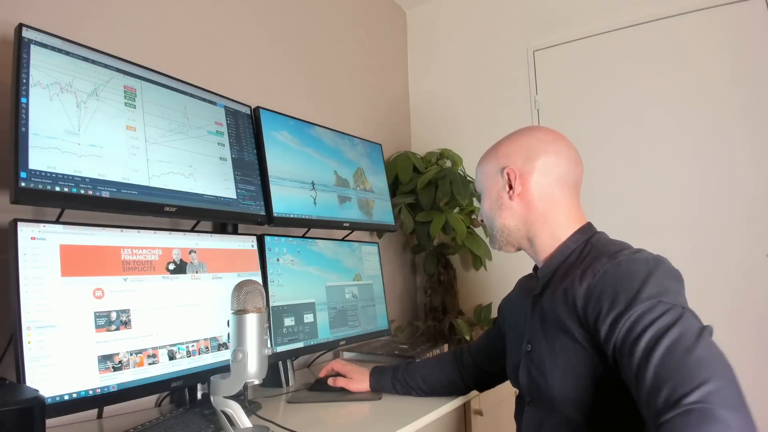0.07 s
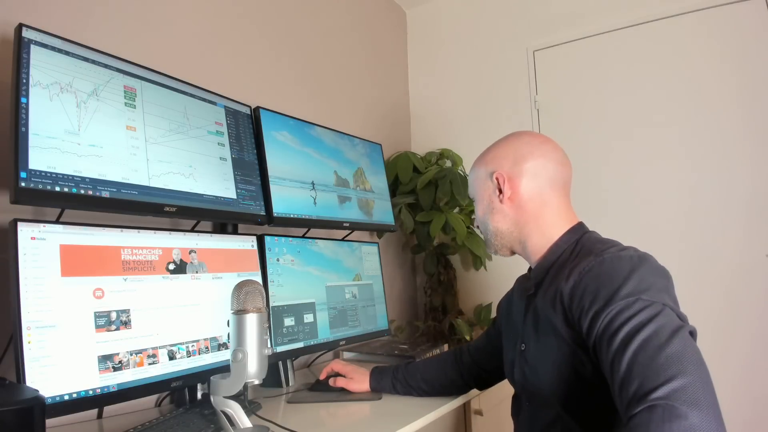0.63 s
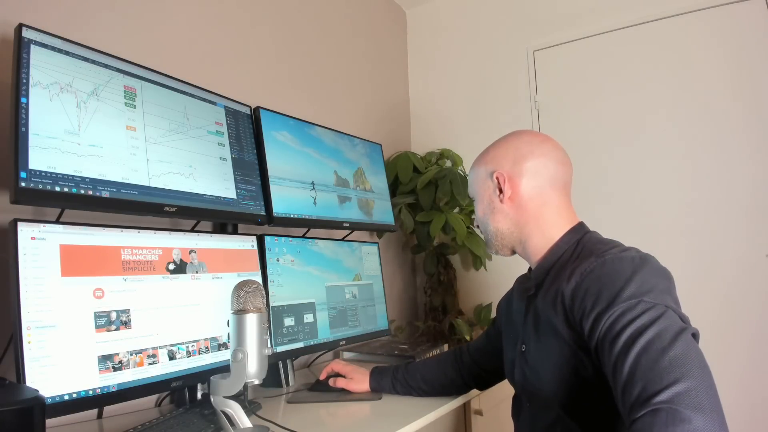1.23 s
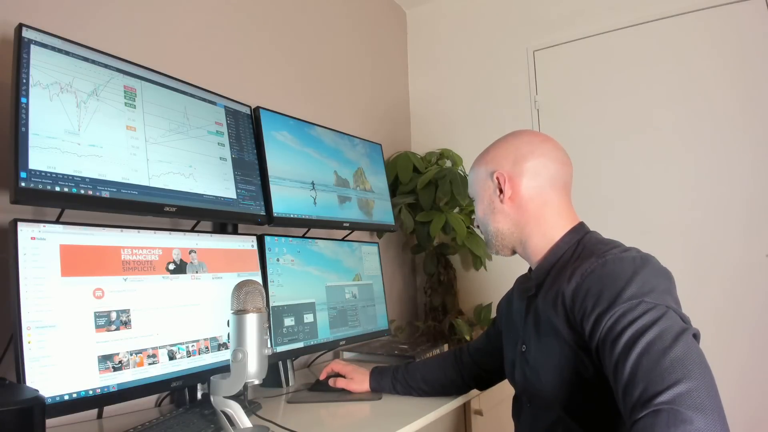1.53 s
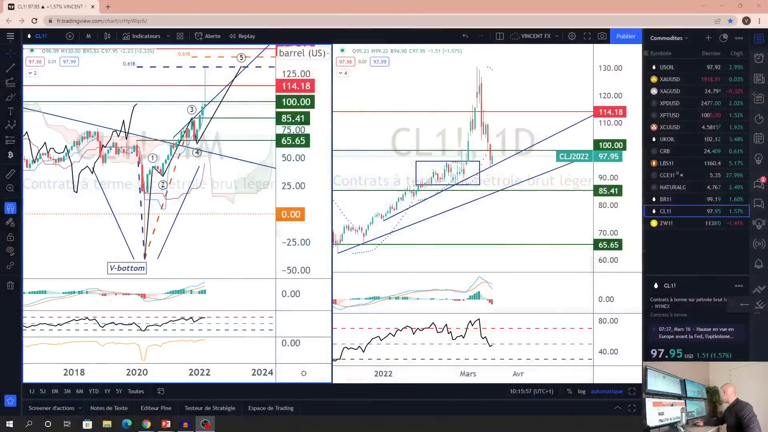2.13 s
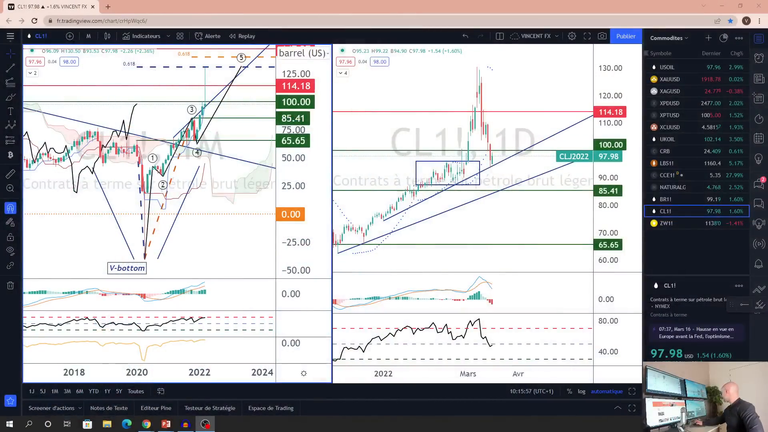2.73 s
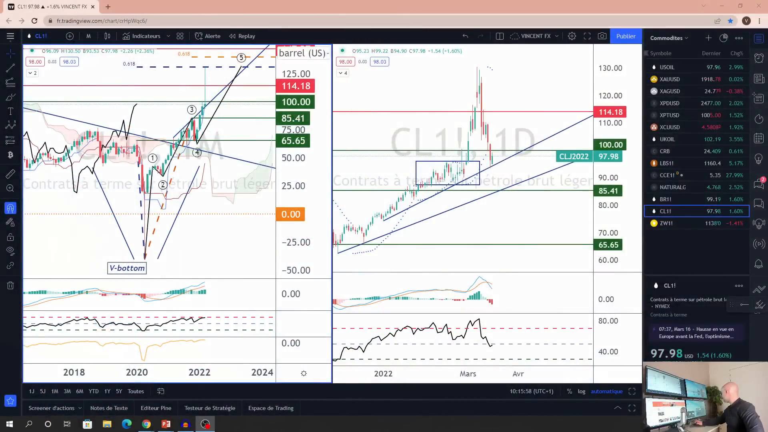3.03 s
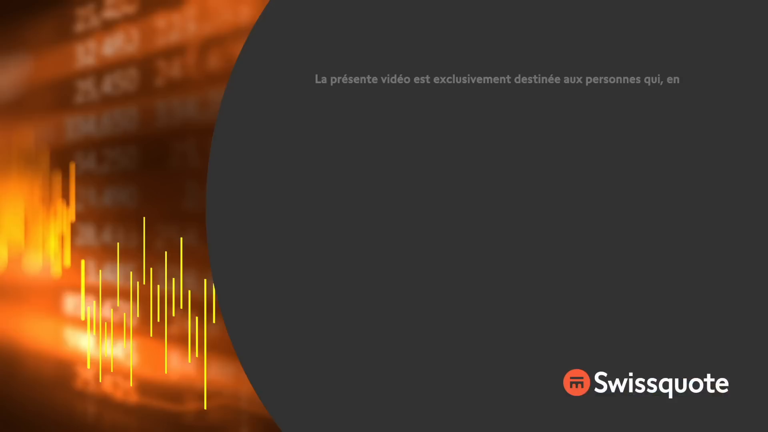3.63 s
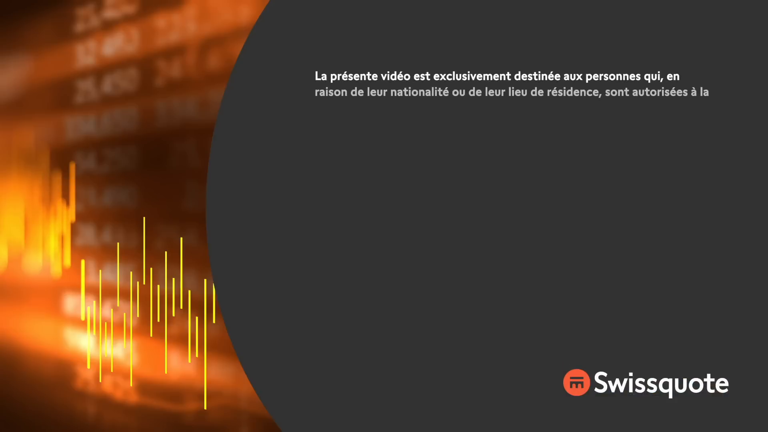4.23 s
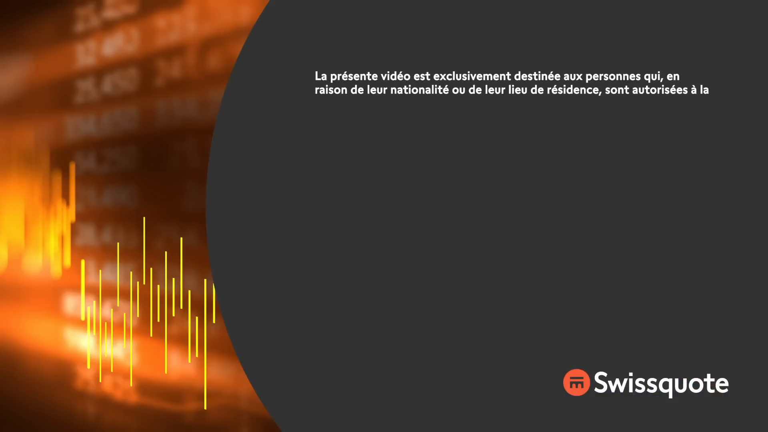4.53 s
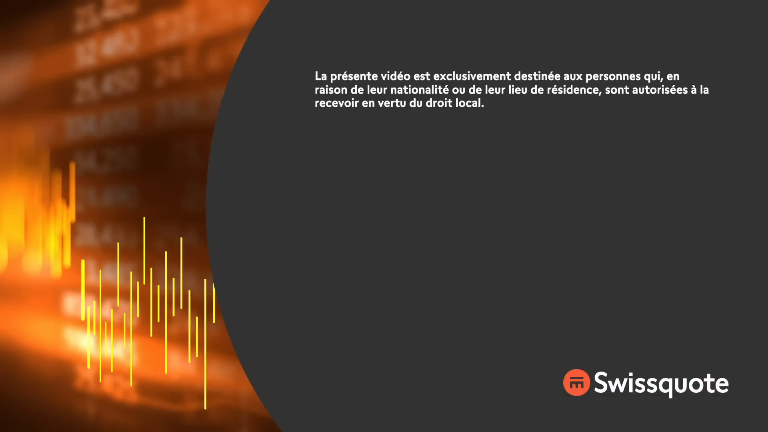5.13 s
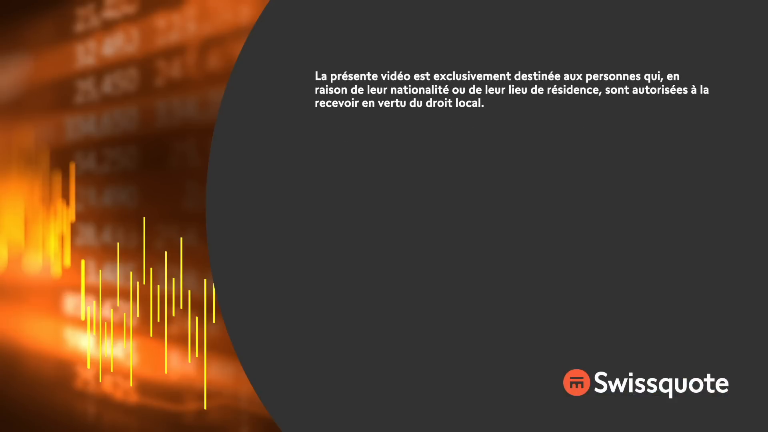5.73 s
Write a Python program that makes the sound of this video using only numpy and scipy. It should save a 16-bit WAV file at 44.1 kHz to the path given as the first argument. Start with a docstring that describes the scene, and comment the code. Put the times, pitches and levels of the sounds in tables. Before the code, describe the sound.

In a small, quiet room, fingers tick lightly and irregularly on keys and plastic. A computer mouse clicks down and up, then slides in short, gritty strokes. A hand bumps the desk, sending a deep rumble through the microphone stand. A second click follows, then more light taps, rubs and soft knocks. A computer hums faintly throughout.

```python
"""Mouse and keys at a quiet desk

Two mouse clicks snap down and up, the switch spring ringing with lever and shell. Fingers tick on keys
and plastic, and the mouse slides with a gritty rub. Knocks travel through the desk into the microphone
stand, which booms and sways. Behind it all, a computer hums and whines faintly in a small room."""
import sys
import numpy as np
from scipy import signal
from scipy.fft import rfft, irfft
from scipy.io import wavfile

SR = 44100
rng = np.random.default_rng(int(sys.argv[2]) if len(sys.argv) > 2 else 0)


def master(y):
    """Save y as 16-bit WAV."""
    cut = np.clip(np.atleast_2d(y).T, -1, 1)
    pcm = np.round(cut * 32767)  # scale
    wavfile.write(sys.argv[1], SR, pcm.astype(np.int16))


N = 255599
TIME = np.arange(N) / SR

# light taps on keys and plastic: t/s, level/dB, brightness/(dB per octave)
KEY_TAPS = [(0.146, -63.5, -1), (0.267, -67, -0.5), (0.35, -76, 10), (1.434, -61, 2.6),
            (1.522, -61.5, -4.5), (1.926, -64.5, -3), (2.125, -51, 1.8), (2.161, -56.5, 0),
            (2.526, -61.5, 0.5), (2.989, -62, -2.3), (3.027, -63, 6.5), (3.339, -65, -4), (3.551, -70.5, 2),
            (4.029, -65, 1), (4.128, -53.5, 2.6), (4.389, -55, 0.1), (4.496, -63, -0.5),
            (4.673, -60.5, -2.8), (5.493, -59.5, -1.8), (5.555, -59.5, -1.5)]
# mouse clicks: press t/s, gain/dB, bottoming-out t/s, gain/dB, release t/s, gain/dB, desk knock/dB
MOUSE_CLICKS = [(1.6561, -1.5, 1.685, -1, 1.7865, -2, -31.5), (3.0776, 0.5, 3.081, -5, 3.1965, 0.5, -33)]


def from_db(db):
    """Decibels to gain."""
    return 10 ** (np.asarray(db) / 20)


def rms_one(x):
    """Scale to unit rms."""
    return x / np.sqrt(np.mean(x ** 2) + 1e-30)


def at_level(hit, db):
    """Give a hit the energy of 5 ms of sound at this level."""
    return from_db(db) * hit * np.sqrt(.005 * SR / np.sum(hit ** 2))


def in_time(rows):
    """Draw an automation curve through each column of timed breakpoints."""
    times, *columns = np.transpose(rows)
    return [np.interp(TIME, times, column) for column in columns]


def add(track, s, sound):
    """Mix a sound in from time s."""
    at = max(round(s * SR), 0)
    track[at:at + len(sound)] += sound[:N - at]


def dying(t, t60):
    """Envelope that loses 60 dB in t60 seconds."""
    return np.exp(-np.log(1000) * t / t60)


def mode(t, hz, t60):
    """A struck mode rings as a decaying sine."""
    return np.sin(2 * np.pi * hz * t) * dying(t, t60)


def band(x, low_hz, high_hz, order=2):
    """Causal band-pass."""
    sos = signal.butter(order, [low_hz, min(high_hz, .45 * SR)], "band", fs=SR, output="sos")
    return signal.sosfilt(sos, x + 1e-18)


def resonate(x, hz, width_hz):
    """One resonance with unity gain at its peak."""
    r = np.exp(-np.pi * width_hz / SR)
    gain = (1 - r * r) / 2
    return signal.lfilter([gain, 0, -gain], [1, -2 * r * np.cos(2 * np.pi * hz / SR), r * r], x + 1e-18)


def body(x, modes):
    """Resonances in parallel, polarity alternating."""
    return sum((-1) ** k * from_db(db) * resonate(x, hz, width)
               for k, (hz, width, db) in enumerate(modes))


def coloured(spectrum):
    """Steady unit-rms noise shaped by an EQ curve: f/Hz, level/dB."""
    hz, db = np.transpose(spectrum)
    grid = np.maximum(np.fft.rfftfreq(N, 1 / SR), 1)
    eq = from_db(np.interp(np.log(grid), np.log(hz), db))
    return rms_one(irfft(rfft(rng.standard_normal(N)) * eq, N))


def tone(hz, waver):
    """A unit-rms tone whose phase wanders slowly."""
    walk = np.cumsum(rng.standard_normal(240))
    wander = np.interp(TIME, np.linspace(0, TIME[-1], len(walk)), walk)
    return np.sqrt(2) * np.sin(2 * np.pi * hz * TIME + waver * wander)


def contact(smear_s, scatter=0.64, stages=5):
    """A sharp blow bounces around inside the plastic: all-passes smear it and keep its spectrum flat."""
    hit = signal.unit_impulse(4096)
    for share in (np.arange(stages) + rng.random(stages)) / stages:
        gap = np.zeros(int(share * smear_s * SR))
        hit = signal.lfilter(np.r_[-scatter, gap, 1], np.r_[1, gap, -scatter], hit)
    return hit


def room(x, echo_db, echo_s=.0088, wet_db=-7.5, build_s=0.0053):
    """A reflection off the desk, then a diffuse tail that dies sooner in the treble."""
    # room decay: f/Hz, t60/s
    decay = [(200, 0.55), (1000, 0.34), (3000, 0.41), (7000, 0.32), (15000, 0.19)]
    hz, t60 = np.transpose(decay)
    t, edges = TIME[:SR // 2], np.geomspace(150, 19000, 11)
    tail = np.zeros(len(t))
    for low, high in zip(edges, edges[1:]):
        band_t60 = np.interp(np.log(low * high) / 2, np.log(hz), t60)
        tail += band(rng.standard_normal(len(t)), low, high) * dying(t, band_t60)
    tail *= 1 - dying(t, build_s)
    reverb = signal.fftconvolve(x, tail / np.sqrt(np.sum(tail ** 2)))[:N]
    echo = np.interp(TIME - echo_s, TIME, x)
    return x + from_db(wet_db) * reverb + from_db(echo_db) * echo


def air(level_db=-64.5):
    """A soft, dark bed of room tone."""
    # colour of the room air: f/Hz, relative level/dB
    spectrum = [(70, -17), (130, -1), (205, -1), (300, -5.5), (410, -12.5), (490, -8), (650, -14.5),
                (1000, -19), (1600, -24.5), (3000, -26.5), (4000, -32), (7000, -32), (11000, -34),
                (15800, -36.5)]
    return from_db(level_db) * coloured(spectrum)


def computer(hum_hz=103.5, fizz_db=-89):
    """The fan hum swells and dips under weaker tones, thin electronic whines and a narrow fizz."""
    # fan hum automation: t/s, level/dB
    hum_levels = [(0.0, -70), (0.06, -83), (0.21, -59.5), (1.0, -71), (1.16, -66), (1.45, -79),
                  (1.81, -56.5), (1.98, -67), (2.55, -56), (2.99, -72.5), (4.52, -57), (4.86, -72.5),
                  (5.1, -56.5), (5.8, -69.5)]
    # fan tones: f/Hz, level/dB
    fan_tones = [(251, -76.5), (332, -83), (375, -82.5)]
    # electronic whines: f/Hz, level/dB
    whine_tones = [(2541, -88), (2740, -99), (3225, -92), (3618, -99), (4398, -94.5), (4495, -89),
                   (4592, -93), (4640, -92.5), (4791, -95), (4840, -97), (5082, -100), (5378, -95),
                   (5426, -98), (5814, -94.5), (6551, -100), (7526, -93), (8845, -100), (10115, -95)]
    hum = from_db(in_time(hum_levels)[0]) * tone(hum_hz, waver=0.14)
    fan = sum(from_db(db) * tone(hz, waver=0.602) for hz, db in fan_tones)
    whine = sum(from_db(db) * tone(hz, waver=0.792) for hz, db in whine_tones)
    fizz = rms_one(band(rng.standard_normal(N), 4380, 4920))
    return hum + fan + whine + from_db(fizz_db) * fizz


def stand(rumble_gain_db=3.5, mean_boom_db=-65, boom_follows=0.53):
    """Bumps sway the microphone stand; the resting arm keeps it rumbling and the desk booming."""
    # heavy bumps: t/s, level/dB
    bumps = [(2.526, -28.5), (2.709, -39.5), (2.930, -49)]
    # modes of the stand: f/Hz, gain/dB, t60/s
    sway_modes = [(27.14, -1.5, 0.71), (31.8, 1, 0.19), (51.9, -4.5, 0.45)]
    # unrest of the arm on the desk: t/s, relative level/dB
    tremor = [(0.0, -58.5), (0.66, -67), (2.36, -56), (2.71, -55), (3.24, -55), (3.83, -56.5), (3.97, -57),
              (5.0, -63), (5.8, -60)]
    out = np.zeros(N)
    sway = sum(-from_db(db) * mode(TIME, hz, t60) for hz, db, t60 in sway_modes)
    attack = 1 - dying(TIME, 0.081)
    for s, db in bumps:
        add(out, s, from_db(db) * sway * attack)
    rumble = coloured([(8, -14.5), (20, -9.5), (27, -6.5), (40, -7.5), (54, -14.5), (75, -22),
                       (130, -24.5), (400, -68.5)])
    boom = coloured([(60, -48), (115, -8), (155, 1.5), (200, -11.5), (260, -29.5), (700, -77)])
    unrest_db = in_time(tremor)[0]
    boom_db = mean_boom_db + boom_follows * (unrest_db - unrest_db.mean())
    return out + from_db(unrest_db + rumble_gain_db) * rumble + from_db(boom_db) * boom


def desk(lag_s=0.006, release_gain_db=-2, tap_gain_db=5, ring_db=-10, ring_lag_s=0.02894):
    """Clicks, taps and the hand knock the desk: close modes swell together and cancel; one rings on."""
    # the hand lands on the desk: t/s, peak level/dB
    thumps = [(2.531, -37), (2.568, -41), (4.036, -40), (4.373, -34), (4.44, -37.5), (4.463, -37)]
    presses = [(s, db) for s, *_, db in MOUSE_CLICKS]
    releases = [(s, db + release_gain_db) for *_, s, _, db in MOUSE_CLICKS]
    touches = [(s, db + tap_gain_db) for s, db, _ in KEY_TAPS]
    knocks = [(s + lag_s, db) for s, db in presses + releases + touches]
    out, t = np.zeros(N), TIME[:SR // 2]
    swell = band(signal.unit_impulse(len(t)), 120, 180, order=4)
    ring = mode(t, hz=155, t60=0.36) * (1 - dying(t, 0.054))
    for s, db in knocks + thumps:
        add(out, s, from_db(db) * swell / np.abs(swell).max())
        add(out, s + ring_lag_s, from_db(db + ring_db) * ring)
    return out


def squeak(jitter_hz=40):
    """A very faint, unsteady whistle arches up and down."""
    # path of the squeak: t/s, f/Hz, level/dB
    glide = [(4.67, 7050, -92), (4.70, 7300, -83), (4.77, 7500, -84), (4.84, 7100, -87), (4.93, 6650, -90)]
    hz, db = in_time(glide)
    hz += jitter_hz * coloured([(10, 0), (100, 0), (400, -30), (1000, -70)])
    gate = (TIME > glide[0][0]) & (TIME < glide[-1][0])
    return from_db(db) * gate * np.sin(2 * np.pi * np.cumsum(hz) / SR)


def slides(gain_db=-5, grit_db=2.5, even_mix_s=0.038, hiss_db_per_halving=1.5):
    """Friction noise, roughened by stick and slip, swells with each stroke; quick strokes hiss more."""
    # strokes of mouse and hand: centre t/s, half length/s, relative level/dB
    strokes = [(0.01, 0.15, -69), (2.215, 0.023, -65.5), (2.32, 0.022, -66.5), (2.406, 0.039, -73.5),
               (2.603, 0.012, -68.5), (3.528, 0.015, -64.5), (3.755, 0.053, -76), (4.124, 0.055, -65.5),
               (4.517, 0.048, -69.5), (5.56, 0.056, -68.5)]
    rub = coloured([(200, -27), (700, 6.5), (2500, 3.5), (5000, -1.5), (12000, -26)])
    hiss = coloured([(1000, -4), (4000, 2), (7500, 4), (11000, -4.5), (16000, -10)])
    grit = from_db(grit_db * rms_one(band(rng.standard_normal(N), 30, 400)))
    out = np.zeros(N)
    for s, half_s, db in strokes:
        swell = np.exp(-((TIME - s) / half_s) ** 2 / 2)
        hiss_db = hiss_db_per_halving * np.log2(even_mix_s / half_s)
        out += from_db(db + gain_db) * swell * (rub + from_db(hiss_db) * hiss)
    return grit * out


def tap_pings(cycles=24):
    """Tapped plastic rings briefly at one pitch."""
    # pings of the tapped plastic: t/s, f/Hz, level/dB
    pings = [(0.359, 12600, -67), (0.475, 2240, -58.5), (2.127, 610, -59), (4.163, 2330, -62),
             (4.187, 1120, -59), (4.354, 470, -59), (4.390, 1060, -58)]
    out, t = np.zeros(N), TIME[:SR // 10]
    for s, hz, db in pings:
        add(out, s, at_level(mode(t, hz, t60=cycles / hz), db))
    return out


def taps(smear_s=.0011, ring_share=0.35, uneven_db=1.1, pivot_hz=2850):
    """Each fingertip tick has its own brightness and strikes the modes of the plastic unevenly."""
    # colour of the contact noise: low f/Hz, high f/Hz, gain/dB
    contact_bands = [(587, 1770, -2.5), (1720, 4300, -3.5), (4500, 8460, -7), (8900, 14000, -16)]
    # modes of the tapped plastic: f/Hz, gain/dB, t60/s
    key_modes = [(628, -6, 0.054), (1102, -8, 0.023), (1617, -6, 0.018), (2580, -12, 0.018),
                 (4150, -10, 0.0091)]
    out, t = np.zeros(N), TIME[:SR // 10]
    for s, db, tilt_db in KEY_TAPS:
        for low, high, colour_db in contact_bands:
            hit = band(contact(smear_s), low, high, order=3)
            hz = low * (high / low) ** rng.uniform(.25, .75)
            ring = rms_one(resonate(hit, hz, hz / 10))
            octaves = np.log2(np.sqrt(low * high) / pivot_hz)
            add(out, s, at_level(rms_one(hit) + ring_share * ring, db + colour_db + tilt_db * octaves))
        for hz, mode_db, t60 in key_modes:
            octaves = np.log2(hz / pivot_hz)
            strength_db = db + mode_db + tilt_db * octaves + uneven_db * rng.standard_normal()
            onset_s = s + smear_s * (1 + rng.random())
            add(out, onset_s, at_level(mode(t, hz, t60), strength_db))
    return out


def snap(shell_db, lever_db, spring_db, spring_hz, crack_db):
    """The switch spring snaps over and rings together with the lever and the hollow mouse shell."""
    # shell, lever and top-end crack resonances, each: f/Hz, width/Hz, gain/dB
    shell_modes = [(617, 42, 5.5), (822, 94, 8.5), (902, 234, 5.5), (1280, 400, 1)]
    lever_modes = [(2530, 370, 8.7), (3290, 87, 11.7), (3780, 280, 9.8), (4570, 960, 7.7)]
    crack_modes = [(8540, 1600, -0.22), (12500, 1600, -2.4), (14700, 1300, 0.5)]
    # lingering modes of the shell: f/Hz, gain/dB, t60/s
    ring_modes = [(830, 0, 0.11), (901, 1.5, 0.24), (2515, 2.5, 0.086), (4930, -6, 0.28)]
    hit = contact(smear_s=0.0004)
    spring_main = resonate(resonate(hit, spring_hz, width_hz=1800), spring_hz, width_hz=1800)
    spring_low = resonate(hit, 5230, width_hz=400)
    spring = at_level(rms_one(spring_main) + from_db(-14.5) * rms_one(spring_low), spring_db)
    shell = at_level(band(body(hit, shell_modes), 550, 2500), shell_db)
    lever = at_level(band(body(hit, lever_modes), 2040, 7900), lever_db)
    crack = at_level(body(hit, crack_modes), crack_db)
    ring = sum(from_db(db) * mode(TIME[:SR // 3], hz, t60) for hz, db, t60 in ring_modes)
    out = from_db(shell_db - 17) * ring
    add(out, 0, shell + lever + spring + crack)
    return out


def button(gain_db=1):
    """Each mouse click is three snaps: the press, the button bottoming out, and the release."""
    # voicing of each snap: shell/dB, lever/dB, spring/dB, spring f/Hz, crack/dB
    press = (-49, -58.5, -44.5, 7355, -52)
    bottom = (-53, -47, -59, 6400, -48.5)
    release = (-49.5, -56.5, -43, 6760, -59.5)
    out = np.zeros(N)
    for press_s, press_db, bottom_s, bottom_db, release_s, release_db, _ in MOUSE_CLICKS:
        add(out, press_s, from_db(press_db) * snap(*press))
        add(out, bottom_s, from_db(bottom_db) * snap(*bottom))
        add(out, release_s, from_db(release_db) * snap(*release))
    return from_db(gain_db) * out


def scene():
    """Clicks and touches pass through the room; everything else reaches the microphone directly."""
    clicks = room(button(), echo_db=-12.5)
    touches = room(taps() + tap_pings() + slides(), echo_db=-12)
    return (clicks + touches + air() + squeak() + desk() + stand() + computer())[None]


def record(dry, cutoff_hz=16000):
    """A steep low-pass trims the very top."""
    return signal.sosfilt(signal.ellip(12, .1, 70, cutoff_hz, fs=SR, output="sos"), dry)


dry = scene()
out = record(dry)
master(out)
```